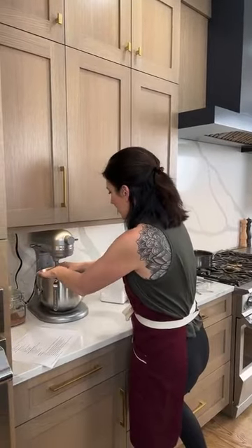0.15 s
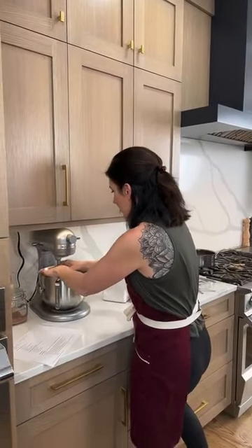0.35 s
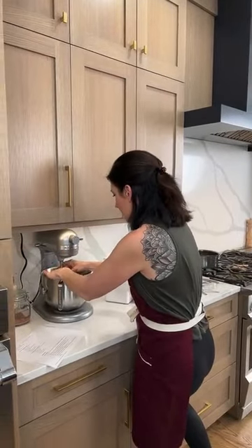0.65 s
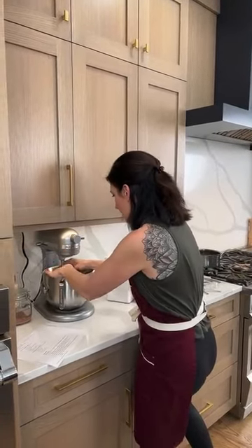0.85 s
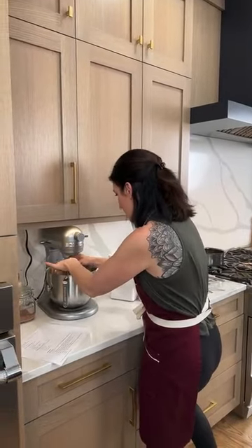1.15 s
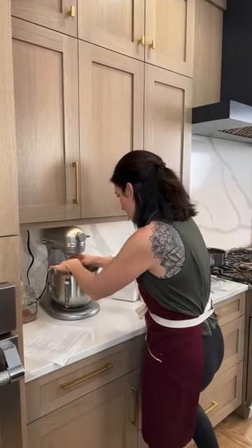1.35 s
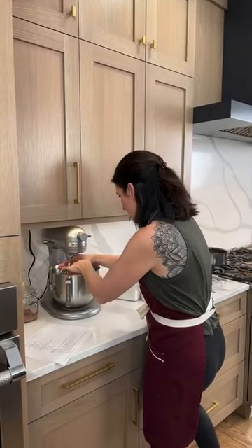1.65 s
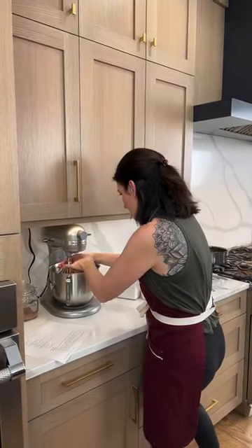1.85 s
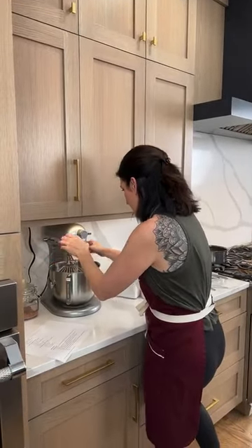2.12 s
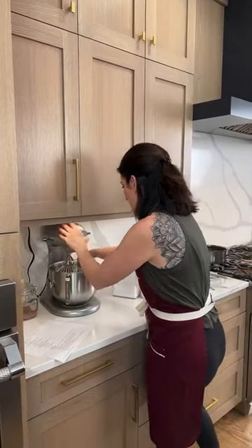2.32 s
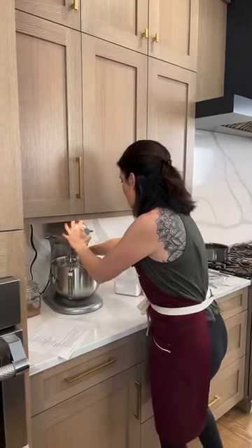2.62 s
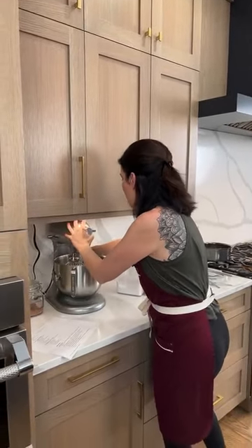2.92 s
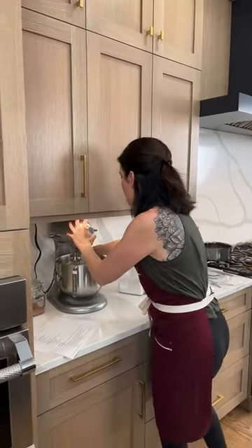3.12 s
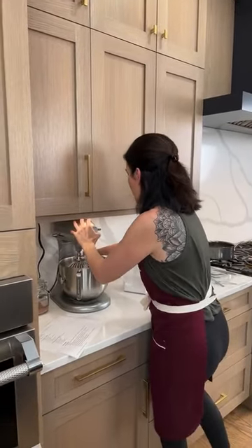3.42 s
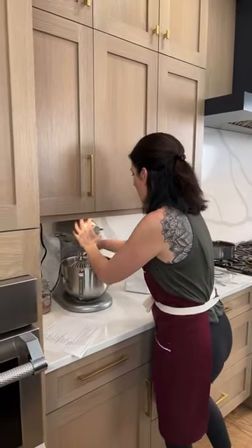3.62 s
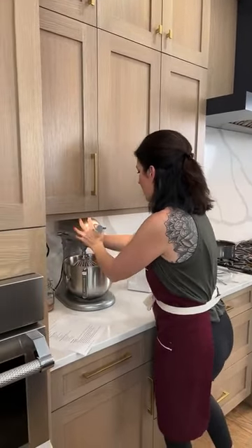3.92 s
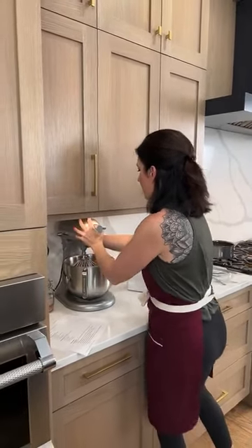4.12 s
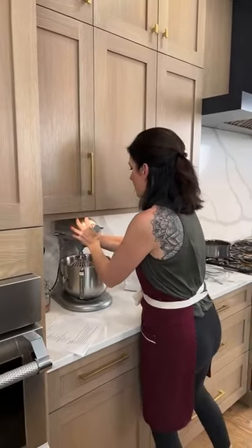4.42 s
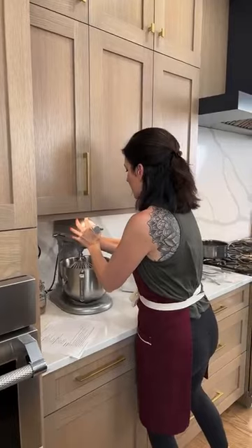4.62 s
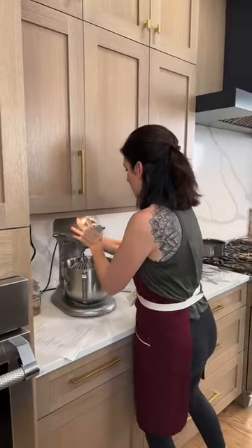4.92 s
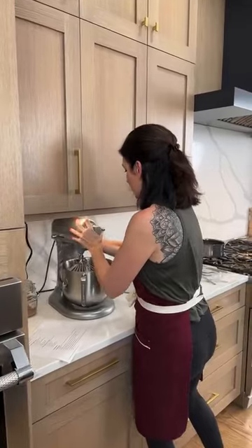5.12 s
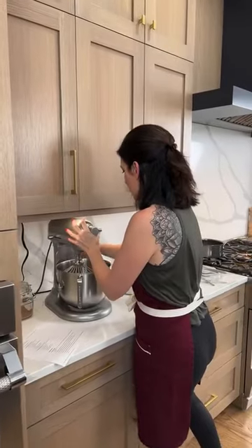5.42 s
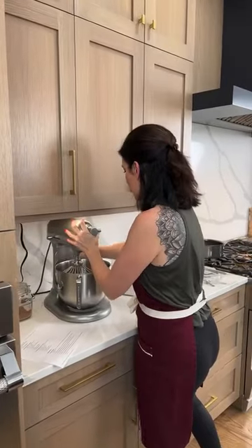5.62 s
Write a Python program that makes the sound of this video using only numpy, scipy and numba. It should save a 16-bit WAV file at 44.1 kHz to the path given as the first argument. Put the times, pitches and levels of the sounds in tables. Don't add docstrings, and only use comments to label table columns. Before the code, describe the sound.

Heard from two metres in a lively kitchen with low throbbing fridge hum: hand-damped metal nudges and rubs, sparse and quiet, then a hard latch click and a ringing bowl drop. A pair of firm knocks and a few tiny clicks lead to a rapid, slowing chain of harsh metallic catches with a piercing squeal and counter rumble, ending in scrapes and a small snap.

```python
import sys
import numpy as np
from scipy import signal
from scipy.fft import rfft, irfft
from scipy.io import wavfile
from scipy.ndimage import uniform_filter1d
from numba import njit

SR = 44100
rng = np.random.default_rng(int(sys.argv[2]) if len(sys.argv) > 2 else 0)


def unload_audio(sound):
    columns = np.transpose(np.atleast_2d(sound))
    steps = np.round(np.clip(columns, -1, 1) * 32767)
    wavfile.write(sys.argv[1], SR, steps.astype(np.int16))


def field_ratio(decibels):
    return 10 ** (np.asarray(decibels, dtype=float) / 20)


N = 253575

# (time [s], peak [dB], held [s])
CATCHES = [(4.530, -29, 0.018), (4.551, -26, .018), (4.585, -26, 0.015), (4.614, -21.5, 0.031),
           (4.649, -19.5, .018), (4.685, -16, 0.018), (4.725, -14.5, 0.016), (4.769, -12.5, 0.015),
           (4.817, -11.5, .016), (4.870, -11.5, 0.017), (4.920, -11, .016), (4.967, -14.5, 0.019),
           (5.012, -32.5, .012), (5.052, -32.5, 0.015), (5.099, -50, .01)]
# (frequency [Hz], width [Hz], level [dB])
HOUSING_MODES = [(673, 48, -33), (763, 16.7, 0.5), (870, 11, 2.5), (1002, 53, -10), (1330, 3, -22),
                 (1620, 35, -3), (1746, 23, -2.5), (1868, 6, -18), (2030, 6.7, -24.5), (2520, 55, -22),
                 (3000, 150, -20.5), (3460, 34, -20.5), (6390, 369, -13.5)]
FULL_STRAIN_DB = -12.5


def unit(x):
    return x / np.sqrt(np.mean(x ** 2))


def top(x):
    return x / np.abs(x).max()


@njit
def svf(x, hz, width):
    y, b, l = np.empty(len(x)), 0., 0.
    for i in range(len(x)):
        g, k = np.tan(np.pi * hz[i] / SR), width / hz[i]
        v = (b + g * (x[i] - l)) / (1 + g * (g + k))
        b, l, y[i] = 2 * v - b, l + 2 * g * v, k * v
    return y


def peak(x, hz, width):
    return svf(x, np.full(len(x), 1. * hz), 1. * width)


def band(x, lo_hz, hi_hz):
    return signal.sosfilt(signal.butter(4, [lo_hz, hi_hz], "bandpass", fs=SR, output="sos"), x)


def walk(rate):
    k = int(SR / rate)
    steps = np.repeat(rng.standard_normal(N // k + 1), k)
    return uniform_filter1d(steps, k)[:N]


def grit(scatter_db, rate):
    return unit(rng.standard_normal(N) * field_ratio(scatter_db * walk(rate)))


def curve(s, values):
    span = np.arange(max(int(s[0] * SR), 0), min(int(s[-1] * SR), N))
    return span, np.interp(span / SR, s, values)


def add(out, s, sound):
    i = max(int(s * SR), 0)
    out[i:i + len(sound)] += sound[:N - i]


def blows(table, modes, length, low_hz, split_hz, rise, drive, flat, ring_db, damp_hz, choke_db):
    out, t = np.zeros(N), np.arange(SR // 3) / SR
    hz, width, db = np.transpose(modes)[:, :, None]
    width = width + damp_hz
    for s, peak_db, low_db, high_db, spot_hz in table:
        envelope = (1 - np.exp(-t / rise)) ** 2 * np.exp(-(t / length) ** 2)
        rattle = rng.standard_normal(len(t)) * envelope
        strike = rattle * np.exp(-t / drive)
        near_db = -7 * np.minimum(np.abs(np.log2(hz / spot_hz)), 1)
        scatter_db = 1.5 * rng.standard_normal(hz.shape)
        grain = np.abs(np.exp(-2j * np.pi * hz * t[:2000]) @ strike[:2000])[:, None]
        floor = 0.53 * np.sqrt(np.sum(strike ** 2))
        share = field_ratio(db + near_db + scatter_db) / np.maximum(grain, floor)
        decays = width * np.sin(2 * np.pi * hz * t) * np.exp(-np.pi * width * t)
        ring = signal.fftconvolve(strike, np.sum(share * decays, axis=0))[:len(t)]
        noise = top(flat * rattle + peak(rattle, spot_hz, .5 * spot_hz))
        ring = field_ratio(ring_db) * top(ring)
        choke = field_ratio(-choke_db * np.clip((t - length) / 0.013, 0, 1))
        both = noise + choke * ring
        thump = field_ratio(low_db) * top(band(noise + ring, low_hz, split_hz))
        middle = top(band(both, split_hz, 4000))
        edge = field_ratio(high_db) * top(band(both, 4000, 9300))
        add(out, s - rise, field_ratio(peak_db) * (middle + thump + edge))
    return out


def clank():
    # (time [s], peak [dB], thump of the weight [dB], edge of the contact [dB], favoured ring [Hz])
    bowl_blows = [
        (2.578, -19.5, -29.5, -8, 3100),
        (2.582, -7, -17.5, -6.5, 2000),
        (2.596, -11, -23, -11, 2100),
        (2.741, -31, -36, -21, 1300),
    ]
    # (frequency [Hz], width [Hz], level [dB])
    bowl_modes = [(653, 52, -3.5), (657, 40, 3.5), (760, 27, -13.5), (870, 33, -12.5), (1042, 6, -2),
                  (1088, 14, 1), (1224, 30, -6.5), (1380, 17, -3), (1484, 15, -8), (1618, 8.4, 2.5),
                  (1660, 15, -6), (1960, 31, -12), (2112, 9, -4), (2264, 46, -10.5), (2493, 10, 0.5),
                  (2650, 12, -0.5), (2860, 25, -6.5), (3168, 13, -4.5), (2950, 20, -9), (3470, 8, 1),
                  (3677, 3, -1.5), (3930, 60, -18.5), (4307, 20, -16), (4985, 22, -26.5), (5437, 20, -22.5),
                  (6331, 14, -14.5), (6650, 62, -22), (7200, 30, -17), (7853, 20, -9), (8430, 56, -15.5),
                  (8800, 60, -12), (9134, 140, -12.5)]
    return blows(bowl_blows, bowl_modes, 0.013, low_hz=519, split_hz=714, rise=0.0036, drive=0.018,
                 flat=0.38, ring_db=4.0, damp_hz=7.7, choke_db=6.0)


def taps():
    # (time [s], peak [dB], thump of the weight [dB], edge of the contact [dB], favoured ring [Hz])
    firm = [
        (0.001, -46, -12, -24, 985),
        (0.235, -57, -13, -24, 1200),
        (0.356, -41, 6.5, -25, 1020),
        (0.693, -48, -20, -21, 1240),
        (1.061, -36, -2, -12, 1130),
        (1.749, -38, 2.5, -32, 1220),
        (3.015, -24.5, -9.5, -20, 1350),
        (3.178, -38, -22, -12, 1030),
        (3.191, -23.5, -16, -17, 1950),
        (3.237, -59, -10, -28, 1200),
    ]
    soft = [
        (0.288, -52, -14, -21, 1090),
        (0.555, -65, 20, -39, 1000),
        (0.783, -41.5, -12, -7, 1680),
        (1.192, -41, -5, -14, 1340),
        (1.348, -58.5, -11, -20, 1015),
        (1.637, -40, -1.5, -32, 1220),
        (3.14, -64, 8, -18, 1570),
        (4.033, -38.5, -19, -18, 2240),
    ]
    # (frequency [Hz], width [Hz], level [dB])
    beater_modes = [(1030, 7.3, 1.5), (1220, 13, 4), (1349, 97, 0.5), (1678, 95, -1), (2069, 190, -2),
                    (2527, 48, -6), (2570, 8.8, -38), (2650, 13, -22), (3098, 23, -6.5), (3705, 11, -15),
                    (4040, 14, -54), (4700, 36, -48), (4830, 27, -24)]
    out = np.zeros(N)
    for table, contact_s in ((firm, 0.025), (soft, 0.03)):
        out += blows(table, beater_modes, contact_s, low_hz=404, split_hz=1216, rise=0.0021, drive=0.041,
                     flat=0.15, ring_db=5.0, damp_hz=34.3, choke_db=-5.0)
    return out


def clicks():
    # (time [s], peak [dB], thump of the weight [dB], edge of the contact [dB], favoured ring [Hz])
    latch_blows = [
        (0.331, -38.5, -26, -25, 2380),
        (2.355, -25, -7, -3.5, 2530),
        (2.435, -47, -19, -8.5, 2324),
        (3.631, -45.5, -29, 0, 3330),
        (5.012, -34, -2, -20, 2280),
        (5.165, -44, -27, -2, 4240),
        (5.522, -41, -28, 7, 2560),
        (5.535, -31.5, -8.5, -1.5, 3200),
    ]
    # (frequency [Hz], width [Hz], level [dB])
    lever_modes = [(1050, 9.3, 6), (1670, 24, -7), (1910, 87, -5), (2190, 14, -8.5), (2280, 12, -9),
                   (2526, 10, 4), (2720, 17, 2), (3353, 250, -6.5), (3800, 290, -6.5), (4250, 37, -10.5),
                   (4700, 66, -15.5), (4670, 160, -15), (5140, 36, -21.5), (6100, 320, -19),
                   (7100, 8.6, -13), (7240, 44, -10.5), (7050, 50, -17), (7660, 140, -4.5), (6940, 40, -6),
                   (8460, 80, -12), (7830, 210, -9.5), (8740, 69, -20.5)]
    return blows(latch_blows, lever_modes, 0.03, low_hz=960, split_hz=1100, rise=0.003, drive=0.038,
                 flat=0.64, ring_db=1.0, damp_hz=39.58, choke_db=2.0)


def judders():
    table = []
    for s, db, _ in CATCHES:
        strain_db = db - FULL_STRAIN_DB
        table.append((s, db - 4.5, -7 - 0.6 * strain_db, -11.5 + .5 * strain_db, 1650))
    return blows(table, HOUSING_MODES, 0.015, low_hz=630, split_hz=1200, rise=.0025, drive=0.0075,
                 flat=1.6, ring_db=7.0, damp_hz=22, choke_db=8.0)


def held(table, attack, release, wobble_db, blur_hz):
    out, waver, drift = np.zeros(N), field_ratio(wobble_db * walk(170)), blur_hz * walk(300)
    for s, length, from_hz, to_hz, db in table:
        span, hz = curve([s, s + length + 3 * release], [from_hz, to_hz])
        t = span / SR - s
        own = np.arange(len(span)) + rng.integers(N // 2)
        stop = np.exp(-(np.maximum(t - length, 0) / release) ** 2)
        shape = np.clip(t / attack, 0, 1) * field_ratio(-4 * t / length + 2) * stop
        cycles = np.cumsum(hz + drift[own]) / SR + rng.random()
        out[span] += field_ratio(db) * np.sqrt(2) * shape * waver[own] * np.sin(2 * np.pi * cycles)
    return out


def squeals():
    main_hz, partner_hz, under_hz = 1615, 1796, 1426
    table, body = [], []
    for s, peak_db, hold in CATCHES:
        strain_db = peak_db - FULL_STRAIN_DB
        db = -19 + 1.47 * strain_db
        table += [(s, hold, main_hz, main_hz, db),
                  (s, hold / 2, partner_hz, partner_hz, db - 7),
                  (s + hold / 2, hold, under_hz, under_hz, db - 16.5),
                  (s + hold + 0.0066, 0.0034, partner_hz, main_hz, db - 5.5)]
        body.append((s, 0.028, 740, 864, -37.5 + 0.44 * strain_db))
    notes = held(table, attack=0.0036, release=0.0027, wobble_db=0.3, blur_hz=11)
    return notes + held(body, attack=0.0036, release=0.0066, wobble_db=5.0, blur_hz=40.3)


def ticks():
    out, t = np.zeros(N), np.arange(SR // 20) / SR
    for s, db, _ in CATCHES:
        rasp = rng.standard_normal(len(t))
        scratch = unit(band(rasp, 1600, 3950)) + .3 * unit(band(rasp, 5200, 8000))
        ping = field_ratio(-5.5) * unit(peak(rasp, 6090, 500)) * np.exp(-t / 0.0051)
        envelope = (1 - np.exp(-t / 0.00147)) * np.exp(-t / 0.0066)
        level = field_ratio(-26.5 + 1.49 * (db - FULL_STRAIN_DB))
        add(out, s - .003, level * (scratch + ping) * envelope)
    return out


def counter_drag():
    # (frequency [Hz], width [Hz], level [dB])
    loose_parts = [(3660, 300, -1), (4550, 400, -3.5), (5430, 500, -4), (6440, 600, -5.5), (7700, 500, -11),
                   (8900, 700, -6.5)]
    on_s, build_up_s, off_s, die_down_s = 4.5, 0.062, 5.19, 0.056
    t = np.arange(N) / SR
    moving = np.clip(np.minimum((t - on_s) / build_up_s, 1 - (t - off_s) / die_down_s), 0, 1) ** 2
    strain_db = np.interp(t, *np.transpose(CATCHES)[:2]) - FULL_STRAIN_DB
    shake_db = -2.5 * (t - on_s) + .09 * strain_db
    shake, rasp, loose = grit(3., 45), grit(2.5, 120), grit(9.0, 220)
    rumble = band(peak(shake, 97, 21), 31, 400) + 0.26 * band(shake, 59, 95) + 0.27 * band(shake, 29, 50)
    boom = band(peak(shake, 252, 23), 60, 1213) + 0.45 * band(shake, 190, 330) + .15 * band(shake, 330, 600)
    grind = band(sum(field_ratio(0.14 * db) * peak(rasp, hz, 130) for hz, _, db in HOUSING_MODES[:9]), 390, 3500)
    brush = band(rasp, 1500, 5200) + 2.5 * peak(rasp, 2140, 100)
    chatter = sum(field_ratio(db) * peak(peak(loose, hz, width), hz, 2 * width) for hz, width, db in loose_parts)
    mix = field_ratio(-31 + shake_db) * unit(rumble)
    mix += field_ratio(-39.5 + shake_db) * unit(boom)
    mix += field_ratio(-35.5 + 0.44 * strain_db) * unit(grind)
    mix += field_ratio(-44.5 + 0.65 * strain_db) * unit(brush)
    mix += field_ratio(-50.5 + 0.68 * strain_db) * unit(chatter)
    return moving * mix


def strokes(rub):
    # (most pressure [s], level [dB], build-up [s], let-go [s], hollow resonance [Hz])
    drags = [
        (.41, -61, 0.051, 0.058, 1050),
        (.568, -63, 0.025, 0.25, 1030),
        (.63, -50, 0.13, 0.068, 1030),
        (1.02, -64, .06, 0.12, 1090),
        (1.22, -67, 0.041, .1, 1400),
        (3.28, -58, 0.16, 0.067, 1030),
    ]
    scrapes = [(.236, -52.5, 0.024, 0.091, 1280), (.36, -39, 0.027, 0.064, 1106),
               (.733, -65.5, 0.13, 0.0093, 1240), (1.075, -44.5, 0.11, 0.11, 1067),
               (1.122, -47, 0.1, 0.062, 1160), (1.166, -51, 0.11, 0.066, 1820),
               (1.775, -50.5, 0.018, 0.028, 1220), (1.795, -61.5, .03, 0.038, 1240),
               (3.06, -56, 0.014, 0.019, 1280), (3.208, -39.5, 0.015, 0.032, 1430),
               (3.244, -42, 0.082, 0.07, 1200), (5.018, -33.5, 0.035, 0.044, 1200),
               (5.06, -39.5, 0.059, 0.071, 1300), (5.1, -50.5, 0.025, 0.08, 814),
               (5.16, -48, 0.055, 0.085, 1160), (1.215, -55.5, .03, 0.094, 1930),
               (3.035, -47, .03, 0.093, 850)]
    wisps = [
        (.99, -76, 0.043, 0.14, 1010),
        (1.155, -55.5, 0.16, 0.039, 1860),
        (3.55, -80, .12, .12, 950),
        (3.615, -75, 0.031, 0.019, 1384),
        (3.855, -79, 0.056, 0.087, 864),
        (3.895, -74, 0.046, 0.089, 890.8),
    ]
    scuffs = [
        (.39, -48.5, 0.067, 0.083, 1920),
        (.63, -64.5, 0.068, 0.085, 2180),
        (1.785, -55.5, 0.034, 0.083, 2220),
        (5.12, -66, 0.099, 0.12, 2500),
    ]
    # (rumble [dB], scratch [dB], hiss [dB], share of the rim overtone [1])
    scuff_colour = (-16, -6, -46, -3.5)
    kinds = ((drags, (3.5, -16, -58, 0.4)), (scrapes, (-16, -17.5, -31, 0.32)),
             (wisps, (-32, -7, 3.5, -0.5)), (scuffs, scuff_colour))
    # (from [Hz], to [Hz])
    rub_bands = (170, 700), (700, 2500), (2500, 5200), (6000, 10500)
    out = np.zeros(N)
    low, middle, bright, hiss = (unit(band(rub, *edges)) for edges in rub_bands)
    bright = unit(bright + 1.2 * peak(bright, 3300, 280) + 0.72 * peak(bright, 4200, 240))
    hiss = unit(hiss + 2.0 * peak(hiss, 6300, 500) + 1.6 * peak(hiss, 8450, 700))
    rim = unit(peak(middle, 1890, 200))
    for table, (low_db, bright_db, hiss_db, share) in kinds:
        rest = field_ratio(low_db) * low + field_ratio(bright_db) * bright + field_ratio(hiss_db) * hiss
        for s, db, build, release, hz in table:
            span, press_db = curve([s - build, s, s + release], [db - 30, db, db - 30])
            hollow = unit(peak(middle[span], hz, 160.0))
            hollow = unit(hollow + share * rim[span] + 0.28 * middle[span])
            add(out, s - build, field_ratio(press_db) * (hollow + rest[span]))
    return out


def sings(rub):
    # (time [s], length [s], from [Hz], to [Hz], level [dB])
    glides = [(0, 0.087, 4600, 4600, -75), (2.29, .07, 9300, 9200, -78), (.295, .055, 2000, 2900, -64),
              (.333, 0.032, 2800, 1100, -45.5), (1.036, 0.046, 465, 886, -46), (.55, .1, 1060, 980, -50),
              (1.06, .1, 950, 1300, -44), (1.036, 0.13, 2010, 2120, -42), (5.164, 0.035, 4300, 4700, -54),
              (5.532, 0.05, 1910, 1670, -38.5), (5.521, 0.052, 3380, 3380, -45),
              (3.03, .09, 1280, 1420, -56), (3.12, 0.049, 1610, 1650, -70), (3.613, .13, 985, 1000, -73),
              (4.475, 0.09, 1610, 1600, -60)]
    out = np.zeros(N)
    for s, length, from_hz, to_hz, db in glides:
        span, hz = curve([s, s + length], [from_hz, to_hz])
        _, swell_db = curve([s, s + 0.37 * length, s + length], [db - 13, db, db - 13])
        add(out, s, field_ratio(swell_db) * unit(svf(svf(rub[span], hz, 200.), hz, 200.)))
    return out


def clear_notes():
    # (time [s], length [s], from [Hz], to [Hz], level [dB])
    part_notes = [(.232, .025, 1700, 1600, -57), (.235, .08, 1000, 1000, -63), (.28, .03, 1150, 1200, -58),
                  (.455, .04, 1000, 1000, -64), (.545, .09, 1040, 1000, -52), (.55, .07, 620, 610, -56),
                  (1.055, .03, 1100, 1130, -44), (1.055, .03, 2160, 2150, -50),
                  (1.05, .03, 3250, 3350, -58), (1.105, .02, 3400, 3550, -57),
                  (1.115, .035, 1180, 1260, -47), (1.125, .03, 2100, 2050, -49),
                  (1.132, .012, 4150, 4100, -60), (1.154, .005, 3300, 3300, -56),
                  (1.165, .02, 1620, 1600, -55), (1.203, .012, 3300, 3300, -62),
                  (1.205, .025, 1500, 1600, -53), (1.64, .025, 1700, 1500, -56),
                  (1.748, .015, 1250, 1240, -49), (2.742, .015, 1270, 1270, -46),
                  (3.013, .022, 1350, 1350, -36), (3.015, .015, 2150, 2150, -45),
                  (3.04, .04, 1290, 1370, -53), (3.08, .05, 1380, 1420, -59),
                  (3.137, .016, 1620, 1620, -60), (3.174, .025, 1050, 1100, -50),
                  (3.203, .014, 4000, 4000, -54), (3.228, .006, 3300, 3300, -59),
                  (3.23, .035, 1100, 1080, -53), (5.04, .17, 2500, 2500, -60),
                  (5.164, .006, 4200, 4300, -54), (5.115, .02, 1650, 1600, -52),
                  (5.05, .025, 1650, 1600, -46), (5.165, .02, 2550, 2500, -52),
                  (4.52, .07, 1050, 1030, -50), (2.66, .14, 560, 550, -58)]
    return held(part_notes, attack=0.0035, release=0.0048, wobble_db=6, blur_hz=44.1)


def thuds():
    # (time [s], peak [dB], frequency [Hz], decay [s])
    knocks = [(0.36, -41.5, 264, 0.025), (.37, -58, 45, 0.039), (0.646, -51, 118, 0.049),
              (2.586, -37.5, 259, 0.023), (2.583, -14.5, 650, .035), (2.583, -21, 1042, .045),
              (2.584, -18.5, 1088, .04), (2.585, -27, 590, .03), (2.586, -30, 735, .03),
              (1.645, -58, 270, .03), (1.752, -54, 260, .03), (3.235, -51, 50, 0.039),
              (3.248, -48.5, 184, 0.02), (4.487, -47, 122, 0.022), (5.097, -30, 190, 0.02),
              (5.136, -24, 98, 0.03), (5.128, -32, 100, .015), (5.178, -34, 170, .02),
              (5.175, -41, 111.4, 0.11), (5.19, -40, 330, .02), (5.1, -38, 420, .015),
              (2.63, -53, 340, .05), (5.24, -52, 55, .08), (5.671, -50, 415, 0.02),
              (4.036, -50.5, 830, 0.036)]
    out, t = np.zeros(N), np.arange(SR // 4) / SR
    for s, peak_db, hz, decay in knocks:
        envelope = (1 - np.exp(-t / 0.0022)) * np.exp(-2.5 * t / decay)
        add(out, s, field_ratio(peak_db + 5) * np.sin(2 * np.pi * hz * t) * envelope)
    return out


def kitchen(x):
    # (frequency [Hz], reverberation time t60 [s])
    decay_times = [(300, 0.42), (1000, 0.67), (2500, 0.52), (4500, 0.58), (6400, 0.24), (7600, .38)]
    t, tail = np.arange(SR) / SR, np.zeros(SR)
    for hz, t60 in decay_times:
        noise = band(rng.standard_normal(SR), hz / 1.4, min(hz * 1.7, 12000))
        tail += noise * np.exp(-np.log(1000) * t / t60)
    tail *= 1 - np.exp(-t / 0.018)
    return signal.fftconvolve(x, tail / np.sqrt(np.sum(tail ** 2)))[:N]


def background():
    # (frequency [Hz], level [dB rms])
    hum_lines = [(47.86, -79.5), (90, -90), (111.73, -68), (118.3, -81.5), (119.95, -60.5), (123.3, -81),
                 (126.55, -89.5), (128.17, -65), (144.62, -70), (167.81, -75)]
    # (frequency [Hz], width [Hz], level [dB rms])
    fan_lines = [(346, 8, -86.5), (580, 7.2, -83), (820, 15, -85), (985, 8.3, -73.5), (1200, 88, -82)]
    # (frequency [Hz], density [dB per Hz])
    air_colour = [(15, -54), (25, -24.5), (85, -17), (121, -10), (195, -19.5), (365, -21), (425, -25.5),
                  (470, -20), (924, -30.5), (996, -25), (1280, -32), (6060, -50.5), (10000, -56.5),
                  (13000, -70), (22000, -120)]
    t = np.arange(N) / SR - .04
    hum = sum(field_ratio(db) * np.sqrt(2) * np.cos(2 * np.pi * hz * t) for hz, db in hum_lines)
    fan = np.zeros(N)
    for hz, width, db in fan_lines:
        fan += field_ratio(db + 0.99 * walk(3.2)) * unit(peak(rng.standard_normal(N), hz, width))
    f = np.maximum(np.fft.rfftfreq(N, 1 / SR), 1)
    air_hz, air_db = np.transpose(air_colour)
    colour = field_ratio(np.interp(np.log(f), np.log(air_hz), air_db))
    air = unit(irfft(rfft(rng.standard_normal(N)) * colour, N))
    return hum + fan + field_ratio(-62 + 2.6 * walk(2)) * air


def scene():
    bowl, beater, latch = clank(), taps(), clicks()
    catches, squeal, drive = judders(), squeals() + ticks(), counter_drag()
    rub = grit(1.8, 150)
    rubs, notes = strokes(rub) + sings(rub), clear_notes()
    sent = bowl + .8 * beater + 1.1 * latch + 1.1 * catches + .45 * squeal
    sent = sent + .15 * notes + 0.527 * rubs + 0.4 * drive
    echoes = field_ratio(-13.5) * kitchen(sent)
    strength = np.sqrt(np.abs(uniform_filter1d(echoes ** 2, SR // 50)))
    echoes = echoes * strength / (strength + field_ratio(-57))
    direct = bowl + beater + latch + catches + squeal + notes + rubs + thuds() + drive
    return (direct + echoes + background())[None]


def low_pass(x):
    return signal.sosfilt(signal.butter(12, 10420, fs=SR, output="sos"), x)


def record(dry):
    top_hz = 10200
    dipped = dry - .55 * peak(dry[0], 5800, 400)
    dipped = dipped - .9 * peak(dipped[0], top_hz, 1500)
    cut = signal.sosfilt(signal.ellip(10, .3, 75, top_hz, fs=SR, output="sos"), dipped)
    return low_pass(cut)


dry = scene()
out = record(dry)
unload_audio(out)
```